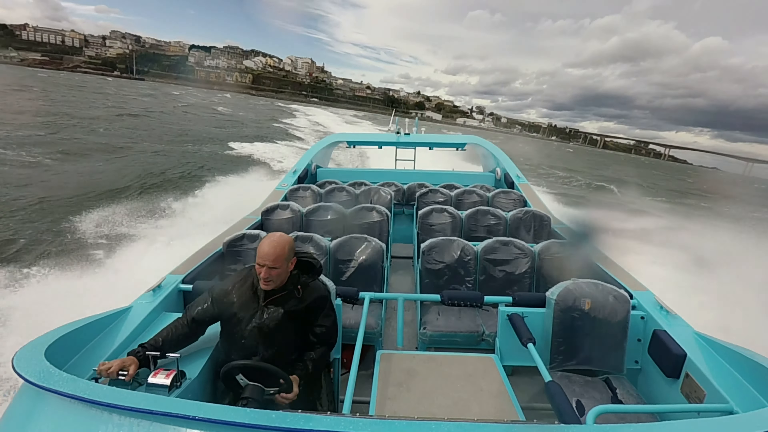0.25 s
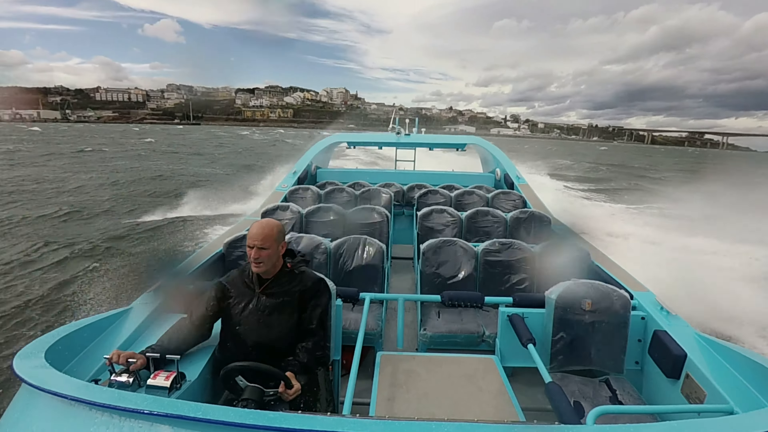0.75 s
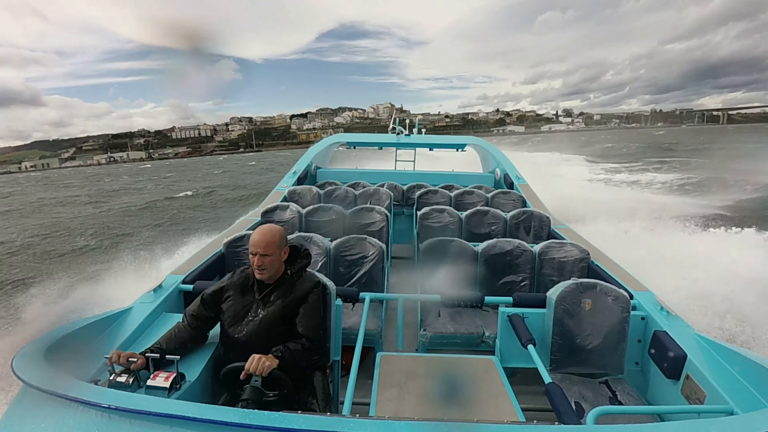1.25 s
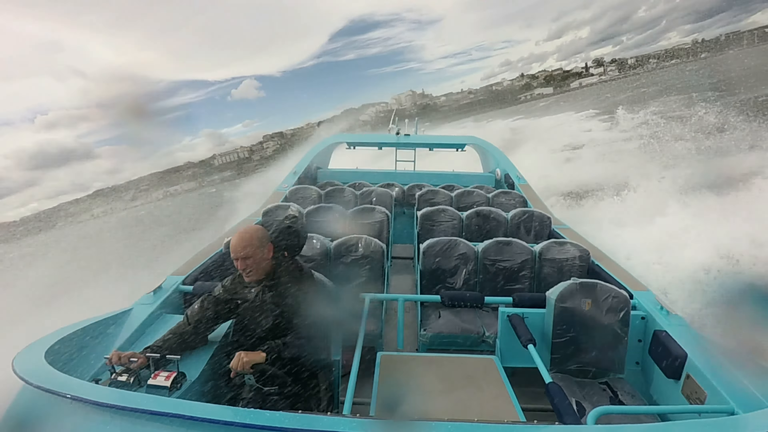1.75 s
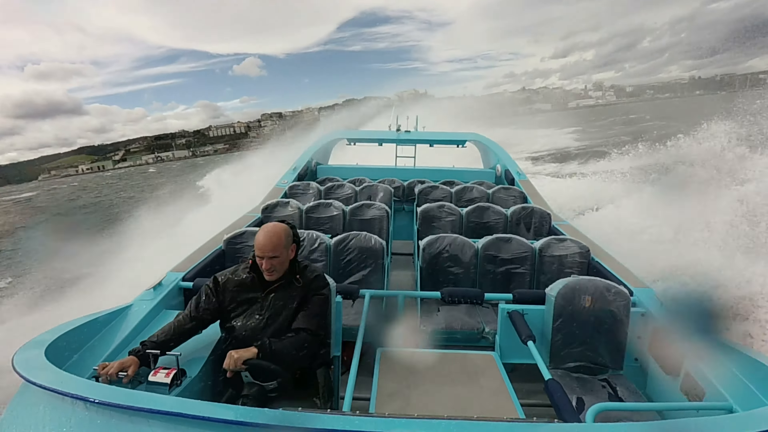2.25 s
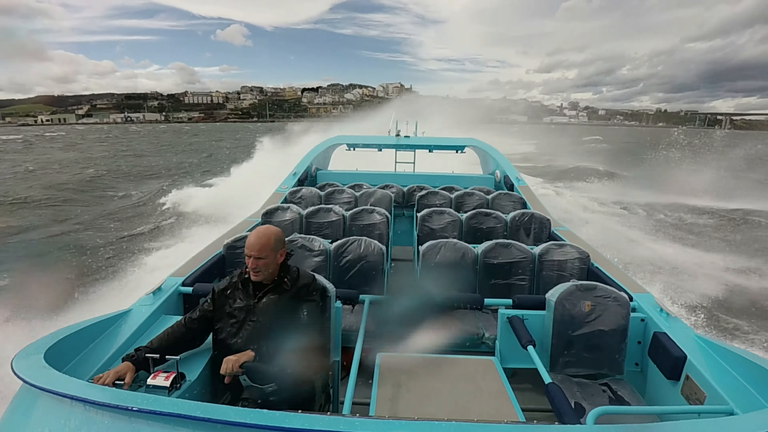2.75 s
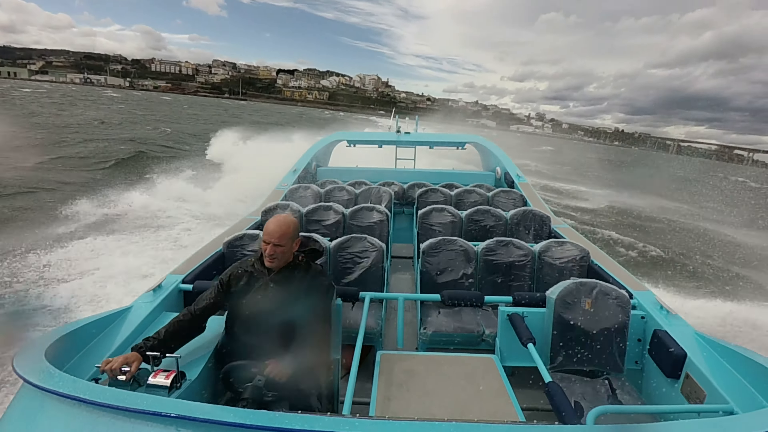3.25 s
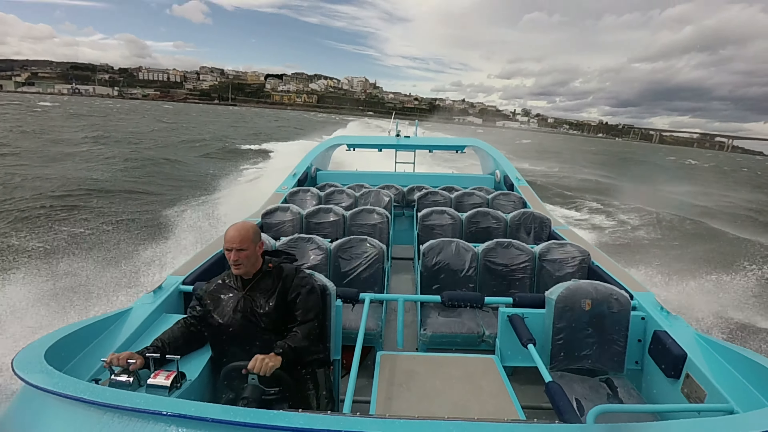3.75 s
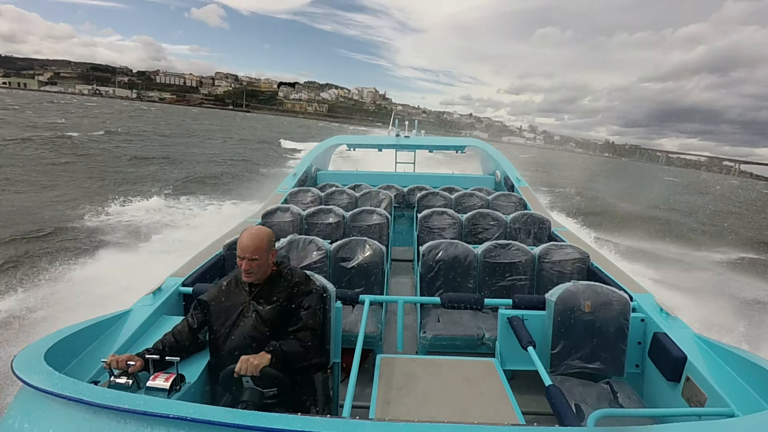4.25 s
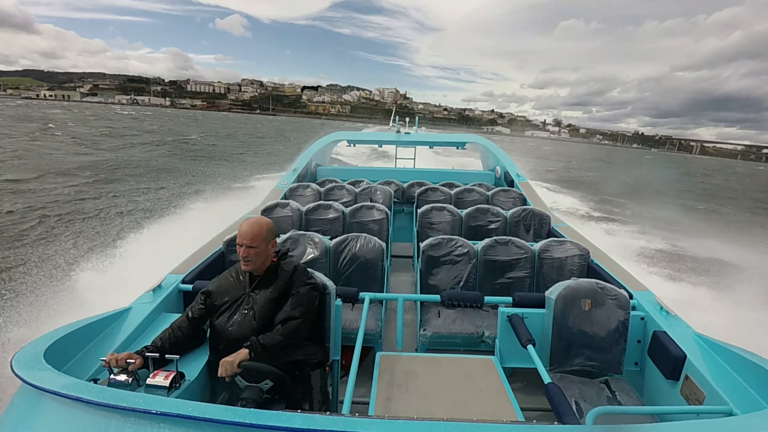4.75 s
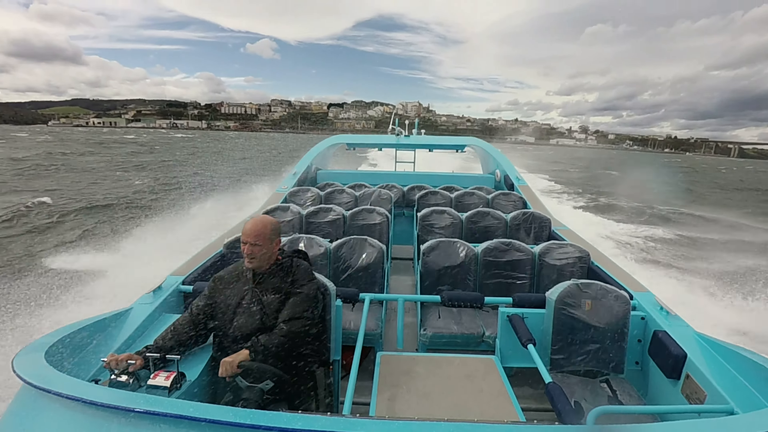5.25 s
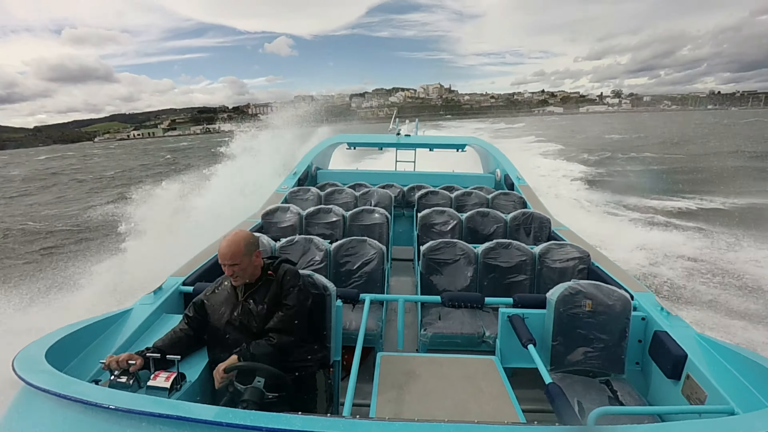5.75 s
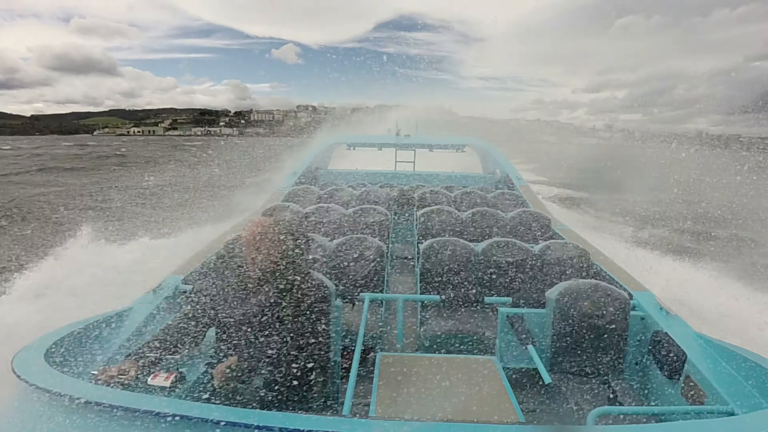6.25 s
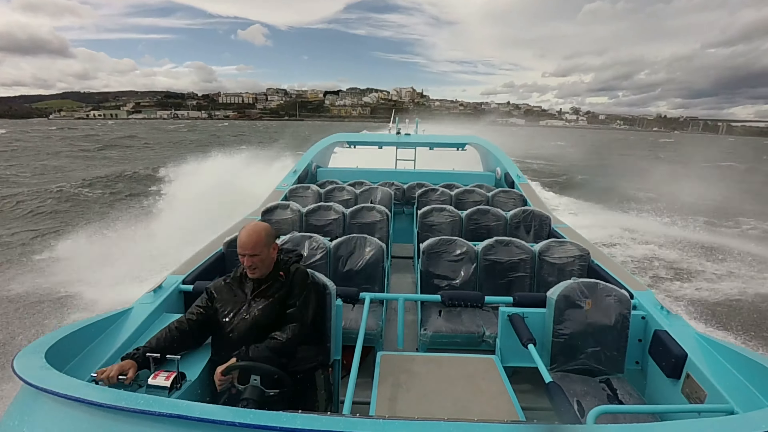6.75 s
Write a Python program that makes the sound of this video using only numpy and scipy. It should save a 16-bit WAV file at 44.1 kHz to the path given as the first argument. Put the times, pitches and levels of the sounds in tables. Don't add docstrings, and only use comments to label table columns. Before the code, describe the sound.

A fast boat's two engines hum evenly over pounding chop while spray rushes, air whistles thinly and water drops crack against the microphone's casing.

```python
import sys
import numpy as np
from scipy import signal
from scipy.fft import rfft, irfft, next_fast_len
from scipy.io import wavfile
from scipy.ndimage import uniform_filter1d

SR = 44100
rng = np.random.default_rng(int(sys.argv[2]) if len(sys.argv) > 2 else 0)


def store_wav(level_fs):
    pcm = np.round(np.clip(np.atleast_2d(level_fs), -1, 1) * 32767)
    wavfile.write(sys.argv[1], SR, pcm.T.astype(np.int16))


def boost_factor(decibels):
    exponent = np.asarray(decibels, float) / 20
    return 10 ** exponent


N = 307818

# t/s, first f/Hz, second f/Hz
CYCLE_SPEEDS = [
    (0, 25.9, 23.75),
    (1, 25.95, 23.85),
    (1.4, 26.1, 23.9),
    (2.2, 26.05, 23.9),
    (2.55, 26.1, 23.1),
    (2.75, 26.1, 23.3),
    (3, 26.1, 23.87),
    (5, 26.1, 23.87),
    (6.98, 26.12, 23.87),
]
# t/s, firing tone level/dB
FIRST_LOAD = [
    (0, -18.5),
    (.5, -22),
    (1.2, -18),
    (1.8, -22),
    (2.6, -23.5),
    (3.3, -24),
    (4.1, -23),
    (4.8, -22),
    (5.6, -20),
    (6.98, -19.5),
]
# t/s, third multiple of firing level/dB
SECOND_LOAD = [(0, -39), (.1, -29), (.97, -31), (1.67, -35.5), (1.77, -40.5), (2.1, -35), (2.41, -47),
               (2.55, -36), (2.86, -33.5), (3.21, -26), (3.54, -29.5), (4.02, -33.5), (4.55, -29),
               (5.05, -29.5), (5.87, -27), (6.7, -27.5), (6.98, -27.5)]
# order, level/dB against the tracked tone
FIRST_ORDERS = [(4, -20.5), (5, -25.5), (9, -22.5), (10, -22), (12, -17.5), (24, -18.5), (26, -20.5),
                (27, -25.5), (29, -24)]
SECOND_ORDERS = [(17, -24), (18, 0.5), (31, -24)]
# t/s, half length/s, change/dB
FIRING_FLEXES = [(.41, 0.12, -3.5), (.6, .1, 0.5), (.74, 0.14, -5.5), (.89, 0.05, -10), (1.03, 0.036, -11),
                 (1.22, 0.057, 5), (1.34, 0.071, -0.5), (1.63, 0.16, -3.5), (1.87, 0.14, 1),
                 (2.02, .15, -6.5), (2.16, .08, 5), (2.25, 0.074, -8), (2.45, 0.16, -7), (2.55, 0.086, 5.5),
                 (2.68, .1, -10), (2.88, 0.087, -3), (2.99, .08, 1.5), (3.91, 0.13, 1.5), (4.08, 0.088, -3),
                 (4.2, 0.054, -4), (4.43, 0.12, 4), (4.49, 0.08, -7.5), (4.9, .08, -0.5), (5.09, .1, 2.5),
                 (5.43, 0.17, -5.5), (5.58, .1, 3), (5.81, .1, -2.5), (6.45, .1, -2), (6.82, 0.13, -2.5)]
# t/s, half length/s, change/dB
LOWER_FLEXES = [
    (.15, 0.47, -15),
    (.88, 0.23, -9),
    (1.77, 0.12, 8),
    (2.14, 0.068, 10),
    (2.82, 0.17, -5),
    (3.85, 0.29, -17),
    (4.55, 0.61, 6),
    (6.3, 0.11, -11),
    (6.8, 0.28, 2.5),
]
# t/s, change/dB
PANEL_LEAN = [(0, -1), (.5, 5), (1, 1), (1.5, 1), (2, 4), (2.5, 1), (3, -3), (3.5, 0), (4, -4), (4.5, -2),
              (5.1, -4), (5.6, -2), (6.1, 2), (6.5, 2), (6.98, 2)]
# t/s, half length/s, pounding change/dB, deck panel change/dB
SLAMS = [(0, 0.12, 9, -3), (.15, 0.18, -3, 5.5), (1.1, 0.48, 3, -3.5), (2.15, 0.063, 16.5, 1.5),
         (2.43, 0.088, -1, -18), (3.58, 0.11, 14.5, 4), (3.71, 0.25, -10, -0.5), (4.48, 0.067, 1, 1.5),
         (4.88, 0.052, 1, -2.5), (4.9, 1, 7, -0.5), (5.17, 0.048, 3.5, 6.5), (6.01, .1, 1, -3.5)]
# f/Hz, level/dB per Hz
POUNDING_SPECTRUM = [(12, -80.5), (20, -29), (70, -13), (94, -10.5), (119, -10.5), (137, -6.5), (145, -2),
                     (190, -20), (320, -120)]
# f/Hz, level/dB per Hz
ROAR_SPECTRUM = [(90, -37.5), (140, -4), (200, 0.5), (300, 2), (400, 2), (520, -3), (600, -1), (740, 1.5),
                 (850, -3), (1100, -16.5), (1600, -22.5), (2500, -32), (6000, -93)]
# t/s, rush level/dB
SPRAY_RUSH = [(0, -44.5), (.7, -43), (.93, -37), (1.42, -39.5), (1.8, -41), (2.06, -35.5), (2.26, -39),
              (2.55, -36.5), (2.85, -40), (3.54, -39.5), (3.66, -43), (4.3, -49), (4.52, -43), (5.11, -44),
              (5.5, -39), (5.75, -43.5), (6.2, -39), (6.98, -45.5)]
# t/s, half length/s, change/dB
GUSTS = [(.04, 0.027, 4), (.115, .04, -4), (.32, .03, -3.5), (.38, .05, 2.5), (1.78, .02, -2),
         (3.6, 0.035, -3.5), (3.633, 0.013, 3), (3.7, .03, -4.5), (3.77, 0.021, -5), (3.805, 0.012, 4),
         (3.8, 0.27, -2.5), (3.88, .05, 2), (3.935, 0.025, -7), (3.99, .02, -6), (4.029, 0.03, 6),
         (4.14, 0.017, -4), (4.17, 0.024, 4.5), (4.23, 0.013, -6), (4.59, 0.031, -1), (5.78, .03, -3),
         (5.84, 0.031, -0.5), (5.91, 0.034, -2), (6.48, 0.069, -2.5), (6.91, .05, -1.5)]
# t/s, body/dB against rush, finest hiss/dB against hiss
WETNESS = [(0, 3.5, -2), (.6, 0.5, 2.5), (1.1, 2.5, 4), (1.6, -1.5, -1), (2.1, -3, -1), (2.6, -4.5, 0),
           (3.1, -7.5, 3), (3.5, -5, 0.5), (3.7, -5, -1), (4.3, 3.5, -4), (5, 1.5, -3.5), (5.5, 0, -6.5),
           (6, 0.5, -5), (6.4, 1, -11.5), (6.98, -4.5, -4)]
# f/Hz, level/dB per Hz
HOUSING_RESPONSE = [(530, -25), (900, 1.5), (1400, -3.5), (2060, -12), (2400, -6.5), (2780, -0.5),
                    (3550, -15.5), (4800, -32), (5500, -26.5), (6300, -24.5), (9700, -21), (10500, -30),
                    (11400, -45), (12000, -66.5), (15000, -89.5)]
# start t/s, length/s, first f/Hz, last f/Hz, level/dB
WHISTLE_PUFFS = [(0, .03, 8100, 9400, -46), (.035, .045, 8900, 8100, -49), (.075, .05, 7600, 7000, -55),
                 (.155, .045, 8200, 8900, -45), (.195, .065, 9100, 8200, -46),
                 (.262, .055, 8600, 8200, -45), (.315, .035, 7400, 7600, -54),
                 (.34, .025, 8900, 10300, -48), (.36, .055, 8500, 9600, -45), (.415, .05, 8800, 9200, -45),
                 (.46, .05, 8600, 8100, -50), (.51, .03, 8300, 9400, -50), (.54, .045, 9000, 7900, -46),
                 (.63, .085, 8100, 8800, -51), (.715, .085, 8400, 9800, -48), (.79, .13, 9500, 10300, -47),
                 (.9, .09, 10200, 9900, -47), (1.02, .17, 9700, 10300, -48), (1.19, .26, 10000, 9900, -51),
                 (3.59, .06, 6700, 7200, -59), (3.645, .07, 6900, 6300, -62), (3.74, .13, 6400, 6800, -65),
                 (3.95, .06, 6600, 6900, -67), (4.22, .08, 7100, 6600, -63), (4.3, .075, 7200, 7300, -61),
                 (4.375, .04, 7700, 7300, -53), (4.42, .055, 8000, 7600, -53),
                 (4.47, .055, 7900, 8500, -52), (4.52, .065, 8400, 7600, -56),
                 (4.625, .035, 7900, 7500, -55), (4.66, .04, 8100, 7200, -55),
                 (4.71, .055, 7550, 7750, -52), (4.755, .045, 8000, 7400, -55),
                 (4.81, .075, 8100, 7700, -57), (4.9, .07, 7700, 7600, -57), (4.97, .055, 7900, 7600, -56),
                 (5.19, .17, 7700, 8600, -56), (5.58, .21, 7900, 7550, -59), (6.8, .18, 7300, 7100, -62)]
# ratio to main tone, best main f/Hz, loss/dB per kHz away, gustiness/dB, level/dB
GAP_MODES = [
    (1, 8000, 0, 2.6, -2),
    (1.21, 7800, 11, 4.5, -4),
    (.69, 6500, 11, 5, -4),
]
# t/s, peak level/dB, treble tick level/dB
DROPS = [(.0229, -31, -42), (1.0165, -26, -40), (1.507, -26, -42), (1.565, -39, -53), (2.063, -14, -46),
         (2.069, -15, -49), (2.1532, -10.5, -46), (2.2813, -8.5, -22), (2.429, -41, -41), (2.98, -34, -45),
         (2.81, -36, -46), (4.0677, -1.5, -22), (4.0704, -8, -24), (4.074, -24, -41), (.22, -34, -51),
         (1.8, -30, -48), (2.048, -30, -50), (2.139, -24, -50), (2.148, -26, -50), (2.162, -16, -51),
         (2.167, -20, -52), (5.37, -38, -53), (6.015, -31, -54), (4.159, -39, -48), (4.287, -40, -65),
         (4.3794, -37, -43), (4.417, -29, -48), (5.186, -41, -56), (6.31, -34, -50), (6.444, -43, -56),
         (6.757, -33, -46)]
# f/Hz, level/dB, t60/s
SHELL_MODES = [(2716, 7, 0.0081), (2950, -10.5, 0.028), (2140, -1, 0.0081), (1640, 2.5, 0.011),
               (1075, -4.5, 0.012), (650, -17, 0.021), (330, -19, .014)]
# f/Hz, level/dB per Hz
TICK_SPECTRUM = [(3800, -40), (4900, -24), (5500, 0), (6400, 0), (7300, -4), (9000, 0), (10300, -5),
                 (11000, -17), (13000, -27), (15000, -36), (17000, -60)]
# t/s, peak level/dB, ring f/Hz, t60/s
WAVE_THUMPS = [(1.3, -19, 620, 0.068), (2.3, -22, 330, 0.03), (2.1415, -11.5, 450, 0.03),
               (2.154, -25, 600, 0.025), (2.148, -11, 860, 0.012), (2.1645, -5, 210, 0.018),
               (2, -17, 300, .02), (3.58, -21, 215, 0.099), (4.0672, -14, 350, .012), (3, -8, 405.7, 0.021),
               (1.8, -24, 230, 0.03), (4.95, -15.5, 583.2, 0.055), (6.369, -32, 2352, .03),
               (6.369, -27, 1960, 0.07)]
# t/s, peak level/dB, ring f/Hz
CHOP_KNOCKS = [(0.805, -16, 725), (2.141, -14, 657), (2.888, -16, 754), (3.002, -16.5, 780),
               (3.059, -18, 750), (3.73, -18, 720), (4.211, -16, 610), (4.325, -20, 676), (4.496, -15, 750),
               (4.674, -11.5, 690), (4.942, -12, 750), (5.06, -16, 772), (6.551, -13.5, 722),
               (6.761, -14, 715)]
# t/s, peak level/dB
SPECKS = [(1.255, -62), (1.293, -59), (1.5064, -64), (1.5623, -61), (1.6394, -68), (1.6794, -69),
          (1.8048, -65), (1.9394, -69), (2.0138, -63), (2.0672, -60), (2.1515, -60), (2.3216, -64),
          (2.4294, -61), (2.8135, -69), (2.8694, -68), (2.9791, -57), (4.1106, -71), (4.4922, -74),
          (4.6628, -73), (4.9751, -76), (5.3727, -64), (5.3894, -74), (5.8022, -75), (6.0097, -63),
          (6.1644, -69), (6.2394, -73), (6.3294, -79), (6.4433, -68), (6.7565, -66)]
# start t/s, length/s, first f/Hz, last f/Hz, level/dB
SQUEAK = (6.445, .052, 1990, 1860, -39)


def evened(x):
    return x / np.sqrt(np.mean(x ** 2) + 1e-20)


def columns(rows, t):
    s, *values = np.transpose(rows)
    return [np.interp(t, s, v) for v in values]


def humps(rows, t):
    s, half, *values = np.transpose(rows)
    coarse = t[::64]
    distance = abs(coarse - s[:, None]) / np.maximum(half, .005)[:, None]
    tents = np.maximum(1 - distance, 0)
    return [np.interp(t, coarse, v @ tents) for v in values]


def wander(hz):
    size = next_fast_len(N)
    lowpass = np.exp(-(np.fft.rfftfreq(size, 1 / SR) / hz) ** 2)
    return evened(irfft(rfft(rng.standard_normal(size)) * lowpass, size)[:N])


def coloured(x, points):
    f, db = np.transpose(points)
    hz = abs(np.fft.fftfreq(8192, 1 / SR))
    level_db = np.interp(np.log(hz + 1), np.log(f + 1), db)
    log_gain = np.log(boost_factor(np.maximum(level_db, -100)))
    response = np.exp(np.conj(signal.hilbert(log_gain)))
    taps = np.fft.ifft(response).real[:4096] * np.hanning(8192)[4096:]
    return signal.oaconvolve(x, taps)[:len(x)]


def passed(x, low_hz, high_hz):
    return signal.sosfilt(signal.butter(2, [low_hz, high_hz], "bandpass", fs=SR, output="sos"), x)


def patchy(patchy_db, flicker_db, frames=8, bins=10):
    count = N // 128 + 5
    a, b, patches = rng.standard_normal((count, 257, 3)).T
    patches = uniform_filter1d(patches, size=bins, axis=0)
    patches = evened(uniform_filter1d(patches, size=frames, axis=1))
    flicker = evened(uniform_filter1d(rng.standard_normal(count), size=frames))
    z = (a + 1j * b) * boost_factor(patchy_db * patches + flicker_db * flicker)
    return evened(signal.istft(z, nperseg=512, noverlap=384)[1][:N])


def loads(t):
    return columns(FIRST_LOAD, t)[0] + 21, columns(SECOND_LOAD, t)[0] + 30


def panel_level(t):
    return -26 + 0.49 * loads(t)[1] + humps(SLAMS, t)[1]


def engine(cycle_hz, level_db, orders, waver_db, drift):
    turns = 2 * np.pi * np.cumsum(cycle_hz) / SR
    out = np.zeros(N)
    for order, db in orders:
        swell, slip = wander(11), wander(5)
        phase = order * turns + drift * slip + 2 * np.pi * rng.random()
        out += boost_factor(db + waver_db * swell) * np.sin(phase)
    return boost_factor(level_db) * np.sqrt(2) * out


def engines(t):
    first_hz, second_hz = columns(CYCLE_SPEEDS, t)
    firing_db = columns(FIRST_LOAD, t)[0] + humps(FIRING_FLEXES, t)[0]
    upper_db = columns(SECOND_LOAD, t)[0]
    lower_db = upper_db - 3.5 + humps(LOWER_FLEXES, t)[0]
    panel_db = panel_level(t)
    lean_db = columns(PANEL_LEAN, t)[0]
    smooth_db = uniform_filter1d(firing_db, SR // 2)
    firing = engine(first_hz, firing_db, [(6, 0.0024)], waver_db=0.1, drift=0.044)
    first = engine(first_hz, smooth_db, FIRST_ORDERS, waver_db=1.8, drift=0.2)
    second = engine(second_hz, upper_db, SECOND_ORDERS, waver_db=1.1, drift=0.22)
    second += engine(second_hz, lower_db, [(12, 0.43)], waver_db=1.5, drift=0.27)
    panel = engine(first_hz, panel_db, [(14, -5.5)], waver_db=1.0, drift=0.67)
    panel += engine(second_hz, panel_db, [(15, -8.5)], waver_db=2.5, drift=0.48)
    panel += engine(second_hz, panel_db + lean_db, [(16, -4.5)], waver_db=2.0, drift=0.4)
    return firing + first + second + panel


def hull(t):
    load_db, slam_db = loads(t)[0], humps(SLAMS, t)[0]
    deep_db = -34 + 0.17 * load_db + slam_db
    roar_db = -30.5 + 0.39 * load_db + 0.27 * slam_db
    panel_hz, panel_width_hz = 374.1, 19
    deep = evened(coloured(patchy(1.17, 1.5, frames=16), POUNDING_SPECTRUM))
    shaking = rng.standard_normal(N)
    panel = evened(passed(shaking, panel_hz - panel_width_hz / 2, panel_hz + panel_width_hz / 2))
    roar = evened(coloured(patchy(0.47, 1.83, bins=3), ROAR_SPECTRUM))
    return boost_factor(deep_db) * deep + boost_factor(panel_level(t) - 9.5) * panel + boost_factor(roar_db + 2.5) * roar


def through_housing(outside, tune):
    points = [(f if 3300 < f < 11000 else f * tune, db) for f, db in HOUSING_RESPONSE]
    return coloured(outside, points)


def spray(t):
    spray_db, gust_db = columns(SPRAY_RUSH, t)[0], humps(GUSTS, t)[0]
    body_db, top_db = columns(WETNESS, t)
    rush_db = spray_db + gust_db
    hiss_db = spray_db - 15.5 + 1.7 * gust_db + 0.62 * body_db
    droplets = rng.choice([-1, 1], N) * (rng.random(N) < 700 / SR)
    patter = boost_factor(2.24 * np.minimum(rng.exponential(1, N), 4)) * droplets
    outside = patchy(1.84, 0.87) + 0.54 * evened(patter)
    wet = t / t[-1]
    inside = (1 - wet) * through_housing(outside, 1.047) + wet * through_housing(outside, 0.97)
    below = []
    for hz in (2100, 4900, 8900):
        below.append(signal.sosfiltfilt(signal.butter(4, hz, fs=SR, output="sos"), inside))
    body, rush, hiss, top = np.diff([0 * inside, *below, inside], axis=0)
    fine = evened(hiss) + boost_factor(top_db + 2.0 - .5 * gust_db) * evened(top)
    return (boost_factor(rush_db + body_db + 3) * evened(body) + boost_factor(rush_db + 1) * evened(rush)
            + boost_factor(hiss_db - 4.5) * fine)


def whistle(t):
    out = np.zeros(N)
    firing = 12 * np.pi * np.cumsum(columns(CYCLE_SPEEDS, t)[0]) / SR
    shake = .032 * np.sin(firing + .8 * wander(20)) + .018 * wander(90) + .004 * wander(900)
    flutter = 1 + .013 * wander(28)
    for mode, best_hz, loss_db, gust_db, mode_db in GAP_MODES:
        gust = boost_factor(gust_db * wander(60))
        for s, length, first_hz, last_hz, db in WHISTLE_PUFFS:
            at = slice(round(s * SR), round((s + length) * SR))
            glide = np.linspace(0, 1, len(t[at])) ** 1.6
            hz = (first_hz + (last_hz - first_hz) * glide) * flutter[at]
            pitch = np.minimum(mode * hz, 10500) * (1 + shake[at] * (hz / 8500) ** 3.5)
            speed_db = 4 * (hz - hz.mean()) / 1000
            level_db = db + mode_db + speed_db - loss_db * abs(hz - best_hz) / 1000
            tone = np.sin(2 * np.pi * np.cumsum(pitch) / SR)
            out[at] += boost_factor(level_db) * gust[at] * tone * signal.windows.tukey(len(hz), .35)
    return out


def drops():
    body, tick = np.zeros(N), np.zeros(N)
    for s, db, tick_db in DROPS:
        body[round(s * SR)] = boost_factor(db)
        tick[round(s * SR)] = boost_factor(tick_db)
    u = np.arange(1500) / SR
    ring = sum(boost_factor(db - 60 * u / t60) * np.sin(2 * np.pi * hz * u) for hz, db, t60 in SHELL_MODES)
    ring = signal.sosfilt(signal.butter(5, 3900, fs=SR, output="sos"), ring)
    treble = coloured(np.eye(1, 600)[0], TICK_SPECTRUM)
    rings = signal.oaconvolve(body, ring / abs(ring).max())[:N]
    ticks = signal.oaconvolve(tick, treble / abs(treble).max())[:N]
    return rings + ticks


def thumps(t):
    out = np.zeros(N)
    knock_t60 = .02
    for s, db, hz, t60 in WAVE_THUMPS + [(*knock, knock_t60) for knock in CHOP_KNOCKS]:
        at = slice(round(s * SR), round(s * SR) + SR // 5)
        u = np.maximum(t[at] - s, 0)
        soft_start = 1 - np.exp(-4 * hz * u)
        out[at] += boost_factor(db - 60 * u / t60) * np.sin(2 * np.pi * hz * u) * soft_start
    return out


def squeak(t):
    s, length, first_hz, last_hz, db = SQUEAK
    u = np.clip((t - s) / length, 0, 1)
    catches = 1 + .5 * np.cos(4 * np.pi * (u - .2) / 1.2)
    tone = np.sin(2 * np.pi * np.cumsum(first_hz + (last_hz - first_hz) * u) / SR)
    return boost_factor(db) * np.sqrt(np.sin(np.pi * u)) * catches * tone


def specks():
    train = np.zeros(N)
    for s, db in SPECKS:
        train[round(s * SR)] = boost_factor(db)
    low_hz, high_hz = 10800, 12800
    return passed(train, low_hz, high_hz) * SR / 2 / (high_hz - low_hz)


def scene():
    t = np.arange(N) / SR
    through_hull = engines(t) + hull(t) + thumps(t)
    at_housing = spray(t) + whistle(t) + drops() + squeak(t) + specks()
    return (through_hull + at_housing)[None]


def top_cut(x):
    return signal.sosfilt(signal.butter(12, 15100, fs=SR, output="sos"), x)


def record(dry):
    edges = signal.windows.tukey(N, 2 * .0006 * SR / N)
    mix = edges * np.clip(dry, -1, 1)
    return top_cut(mix)


dry = scene()
out = record(dry)
store_wav(out)
```